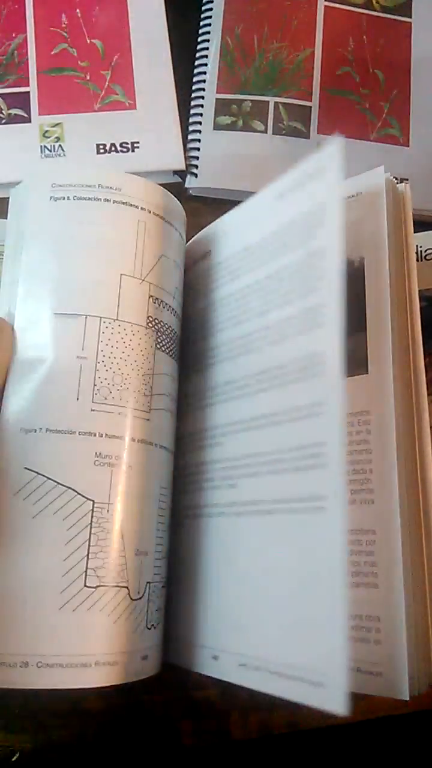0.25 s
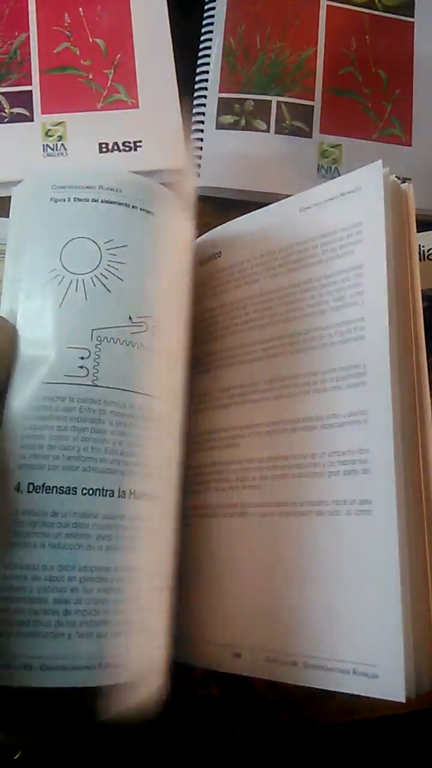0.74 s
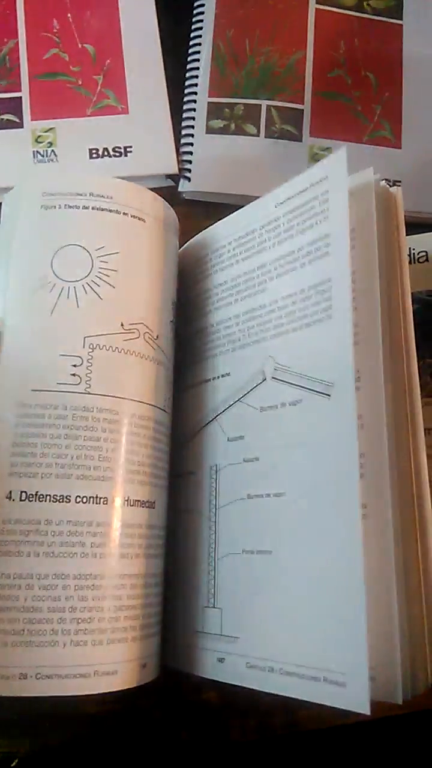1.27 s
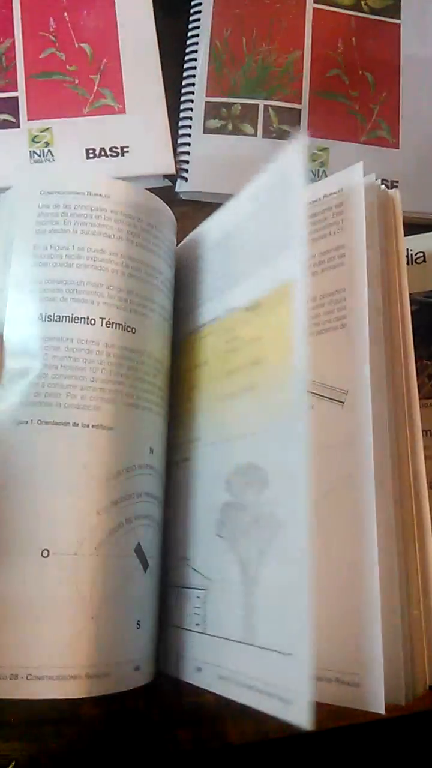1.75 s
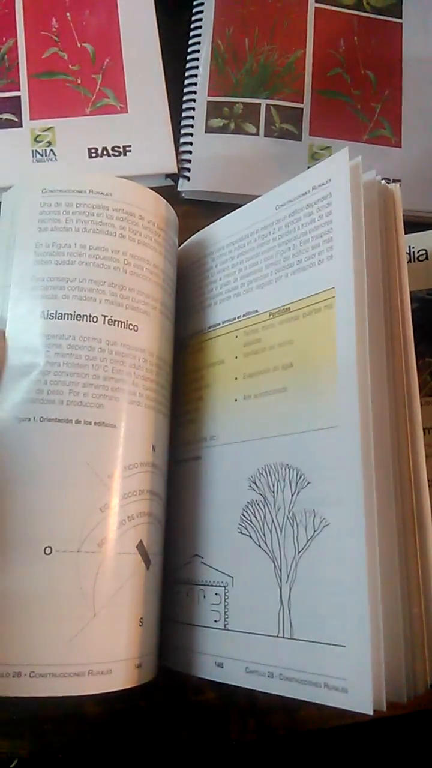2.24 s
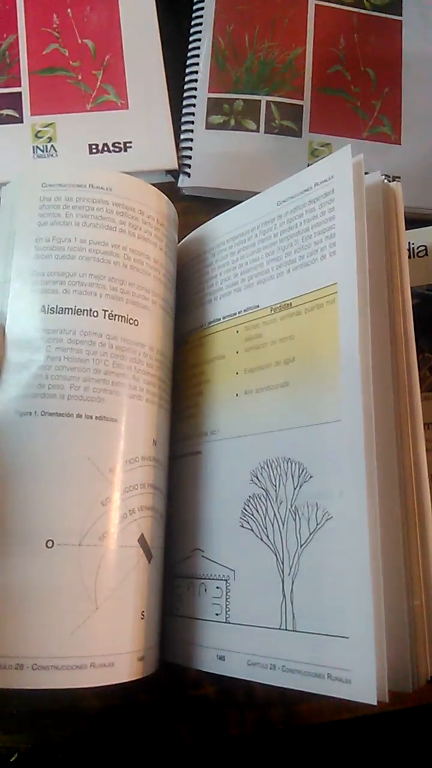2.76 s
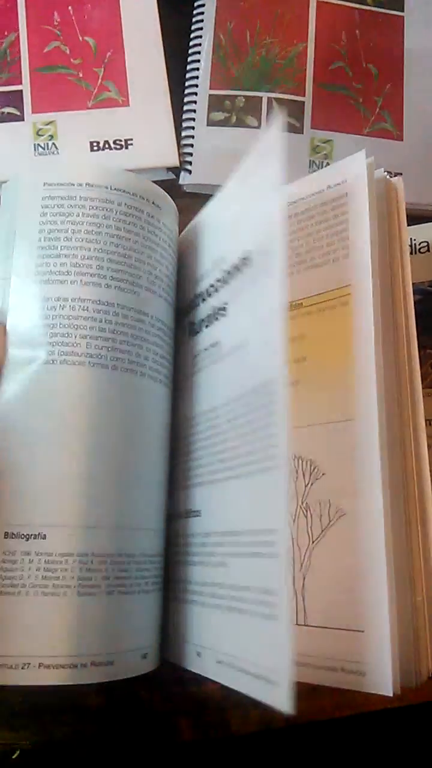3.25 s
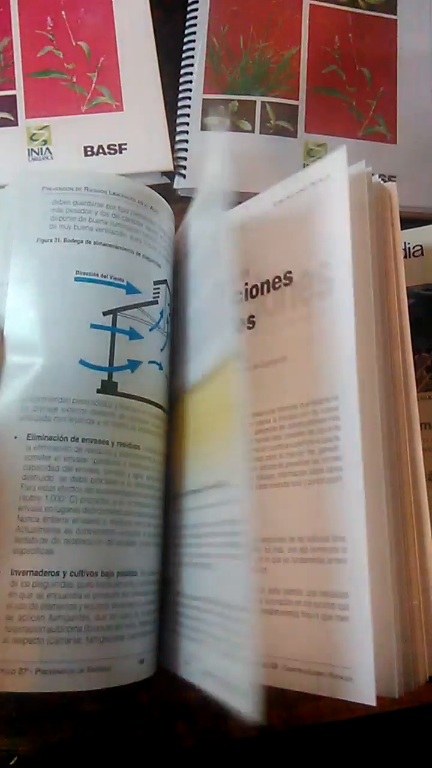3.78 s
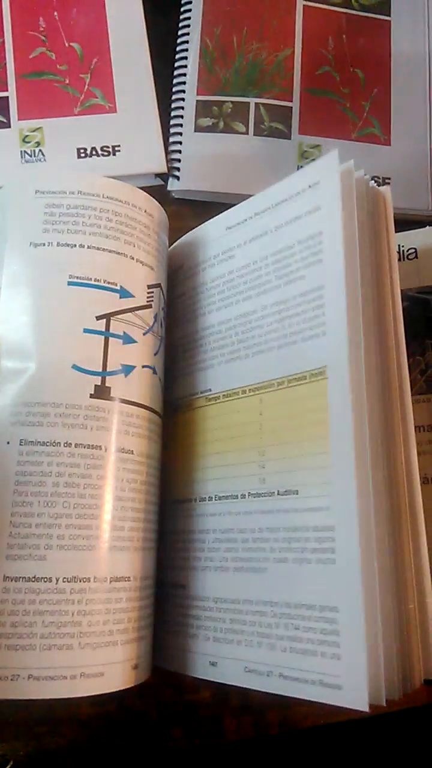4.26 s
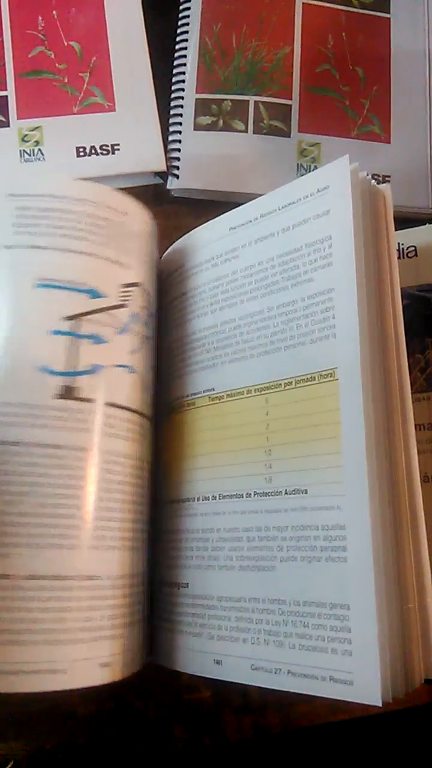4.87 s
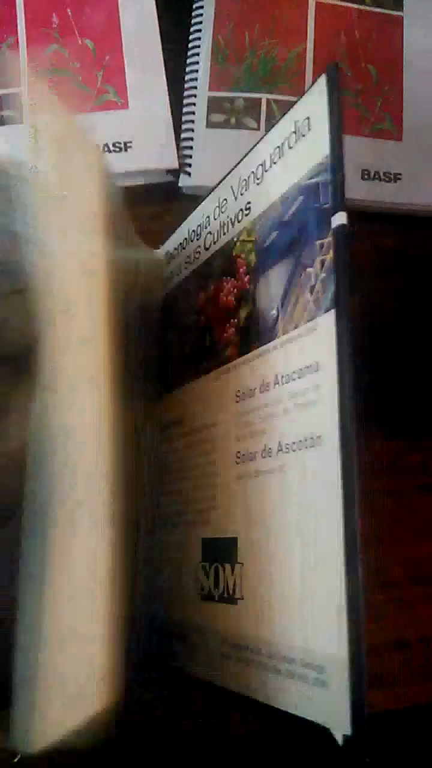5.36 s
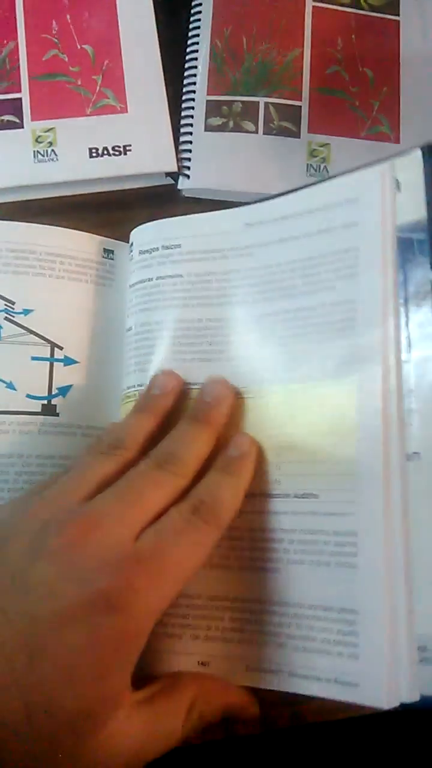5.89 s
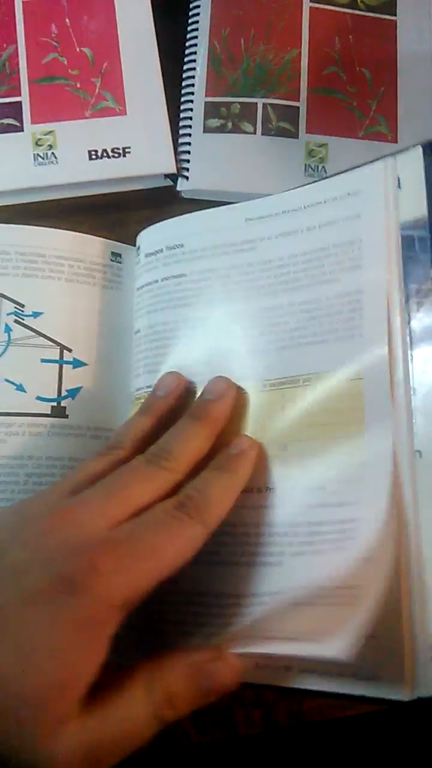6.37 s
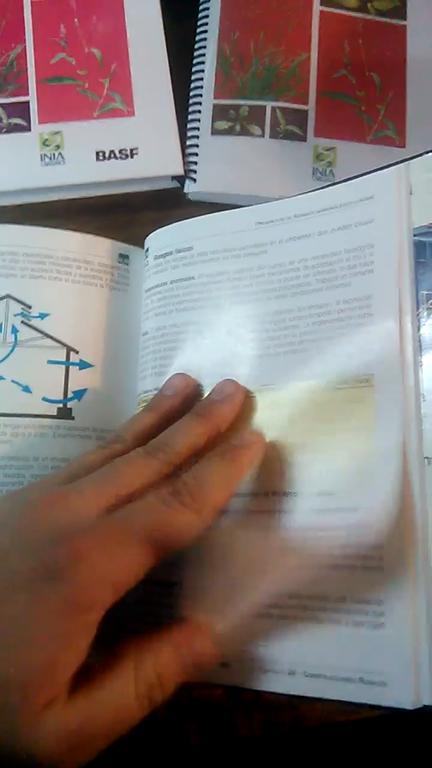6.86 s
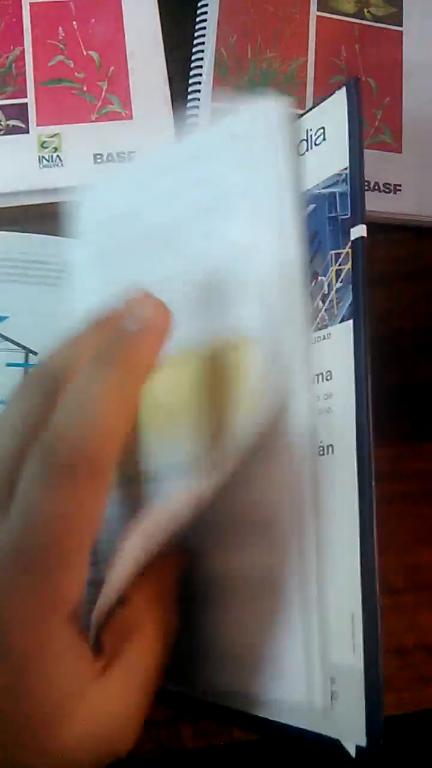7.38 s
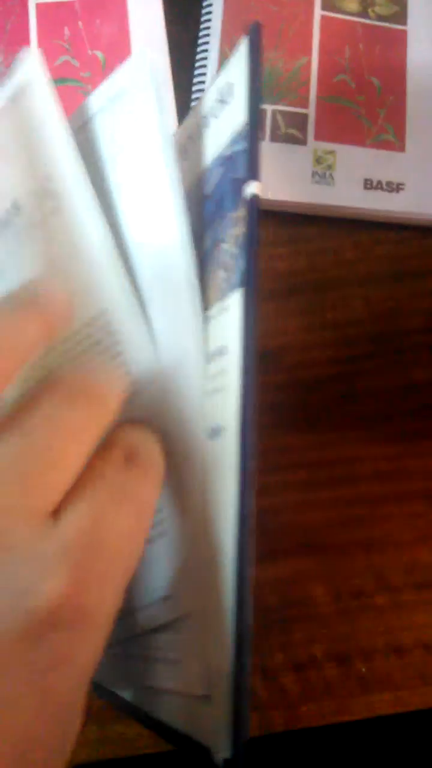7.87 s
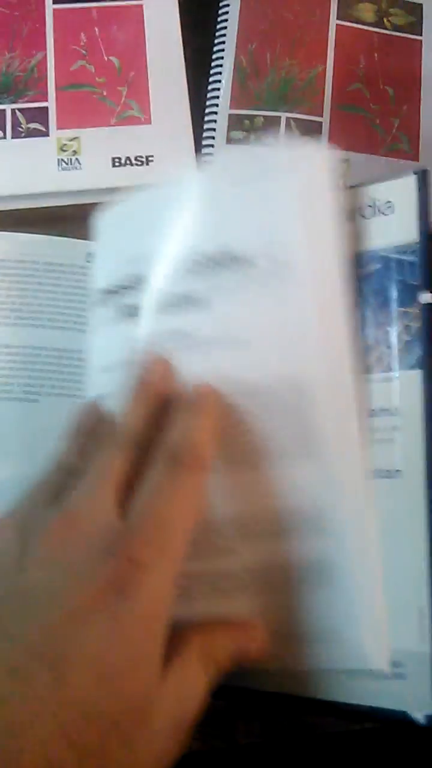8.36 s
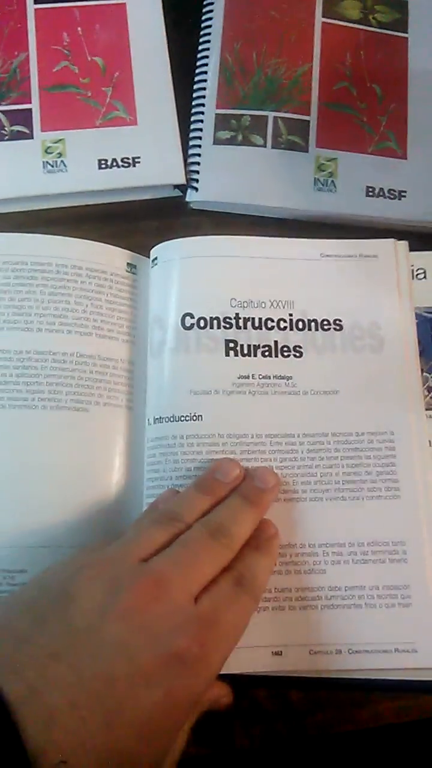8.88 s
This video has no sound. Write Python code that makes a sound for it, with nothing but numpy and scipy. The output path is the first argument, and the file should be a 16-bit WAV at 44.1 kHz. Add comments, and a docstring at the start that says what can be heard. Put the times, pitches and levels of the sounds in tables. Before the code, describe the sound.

Book pages are turned and riffled by hand, crackling and rustling with a soft thud, over a faint low hum.

```python
"""Leafing through a thick book

A hand turns, riffles and drops pages close to a one-microphone phone in a small room.
Edges buckle, crackle and snap; sheets slide and flap; fingers stick and slip on glossy paper;
the block of pages thuds on the table. A low wavering hum fills the room.
The phone dulls the treble and limits the loudest moments."""
import sys
import numpy as np
from scipy import signal
from scipy.fft import rfft, irfft, next_fast_len
from scipy.io import wavfile
from scipy.ndimage import uniform_filter1d, minimum_filter1d, map_coordinates

SR = 44100
rng = np.random.default_rng(int(sys.argv[2]) if len(sys.argv) > 2 else 0)


def digitize_waveform(pressure):
    """Quantize a signal to 16-bit integers and store it at the path in sys.argv[1].

    Rows of a 2-D input are taken as channels; values are limited to [-1, 1].
    """
    field = np.atleast_2d(pressure).T
    bounded = np.clip(field, -1, 1)
    quanta = np.round(bounded * 32767).astype(np.int16)
    wavfile.write(sys.argv[1], SR, quanta)


N = 402633
FLAT = [(20, 0), (20000, 0)]  # White spectrum. Each row: frequency in Hz, level in dB.


def amp(db):
    """Gain of a level in dB."""
    return 10 ** (np.asarray(db) / 20)


def unit(x):
    """x at rms 1."""
    return x / np.sqrt(np.mean(x ** 2) + 1e-20)


def along(points, hz):
    """Interpolate (Hz, value) points on a log axis."""
    knots_hz, values = np.transpose(points)
    return np.interp(np.log(hz + 1), np.log(knots_hz + 1), values)


def band(hz, centre_hz, octaves):
    """Bell of gain, 6 dB down at its edges."""
    return amp(-24 * (np.log2((hz + 1) / centre_hz) / octaves) ** 2)


def resonance(hz, centre_hz, width_hz, db, skirt):
    """Resonant peak; a larger skirt exponent steepens its sides."""
    return amp(db) / (1 + (2 * (hz - centre_hz) / width_hz) ** 2) ** skirt


def filtered(x, response):
    """x through a response given as a function of Hz."""
    size = next_fast_len(N + SR // 2)
    return irfft(rfft(x, size) * response(np.fft.rfftfreq(size, 1 / SR)), size)[..., :N]


def wobble(rate_hz):
    """Smooth random curve, rate_hz knots a second."""
    knots = rng.standard_normal(int(N * rate_hz / SR) + 4)
    return map_coordinates(knots, [np.arange(N) * rate_hz / SR])


def peaks(peak_s, db, rise_db_per_s, fall_db_per_s):
    """Summed gain of peaks that rise and fall linearly in dB."""
    grid = np.arange(0, N + 64, 64)
    since_s = grid[:, None] / SR - peak_s
    gain = amp(db + np.where(since_s < 0, rise_db_per_s, -fall_db_per_s) * since_s).sum(axis=1)
    return np.interp(np.arange(N), grid, gain)


def stroke(length_s, attack_s, release_s):
    """Time axis and envelope: rise, hold until length_s, fall 60 dB per release_s."""
    t = np.arange(round((length_s + 0.2) * SR)) / SR
    return t, np.clip(t / attack_s, 0, 1) * amp(-60 * np.maximum(t - length_s, 0) / release_s)


def shaped(x, envelope):
    """x under an envelope, at rms 1 where it is open."""
    return envelope * x * np.linalg.norm(envelope) / np.linalg.norm(envelope * x)


def span(x, start_s, t):
    """View of x from start_s, as long as t."""
    return x[round(start_s * SR):][:len(t)]


def grainy_noise(spectrum, rate_hz, spread_db, share, clump_db, patchy_db):
    """Uneven impulses (in paper, tiny buckles) plus noise, rms 1; share is their part of the power."""
    chance, size, noise = rng.random(N), rng.exponential(1, N), rng.standard_normal((2, N))
    grains = unit((chance < rate_hz / SR) * amp(spread_db * np.minimum(size, 2.5)) * noise[0])
    mix = amp(clump_db * wobble(45)) * (np.sqrt(share) * grains + np.sqrt(1 - share) * noise[1])
    frames = signal.stft(mix, nperseg=256)[2]
    patches = uniform_filter1d(rng.standard_normal(frames.shape), size=3, axis=0)  # over frequency
    patches = uniform_filter1d(patches, size=12, axis=1)  # over time
    mix = signal.istft(frames * amp(patchy_db * unit(patches)), nperseg=256)[1][:N]
    return unit(filtered(mix, lambda hz: amp(along(spectrum, hz))))


def sheet_reflection(hz, depth_db=3):
    """A near sheet throws sound back after 1-2 ms and ripples its spectrum."""
    return amp(depth_db * np.cos(2 * np.pi * hz * rng.uniform(.001, .002)))


def hum():
    """Low drone, narrow tones and thin hiss, each wavering in level."""
    # Spectra. Each row: frequency in Hz, relative level in dB.
    drone_spectrum = [(15, -59), (25, -19.5), (55, -3.5), (124, -6), (253, -3), (372, -8), (448, -12.5),
                      (531, -9), (601, -16), (818, -11), (1000, -18.5), (1300, -62.5), (2200, -120)]
    hiss_spectrum = [(700, -26), (1100, -0.5), (2000, -3.5), (3200, -7), (3700, -11.5), (4300, -2.5),
                     (6000, -8), (16000, 1)]
    # Two low tones, then the upper ones. Each row: centre in Hz, width in Hz, relative level in dB.
    tone_bands = [(180.5, 8.5, -1.5), (260.2, 10, -2.5), (366, 40, -8), (545.7, 37, -7), (670, 95, -10.5),
                  (805, 24, 0), (857.4, 32, -4)]
    # Drift of drone and low tones. Each row: time in seconds, gain in dB.
    drift = [(0.0, -46.5), (5.74, -50.5), (7.5, -47), (9.13, -51)]
    # Swells of the upper tones. Each row: time in seconds, peak in dB.
    swells = [(.05, -45), (.45, -45), (0.851, -50.5), (1.318, -40.5), (2.2, -44), (2.62, -50), (3.151, -43),
              (3.429, -46.5), (4.06, -46), (4.702, -52), (4.84, -44.5), (5.051, -44.5), (6.142, -43),
              (6.6, -45)]
    drone = grainy_noise(drone_spectrum, rate_hz=50, spread_db=1.5, share=.05, clump_db=.6, patchy_db=2)
    tones = [amp(2.5 * wobble(6))
             * filtered(rng.standard_normal(N), lambda hz: resonance(hz, *row, skirt=1.05))
             for row in tone_bands]
    swell = amp(-60) + peaks(*np.transpose(swells), rise_db_per_s=300, fall_db_per_s=100)
    hiss = grainy_noise(hiss_spectrum, rate_hz=100, spread_db=1.5, share=.03, clump_db=.8, patchy_db=2.2)
    low = amp(2.5 * wobble(3.19)) * drone + amp(-9) * unit(sum(tones[:2]))
    low *= amp(np.interp(np.arange(N) / SR, *np.transpose(drift)))
    return low + swell * unit(sum(tones[2:])) + amp(-52 + 5.9 * wobble(2.88)) * hiss


def room(x):
    """Reverberation: each frequency dies at its own speed."""
    # Room decay. Each row: frequency in Hz, T60 in seconds.
    decay = [(200, 0.99), (2000, 0.42), (7000, 0.5)]
    hz, t, frames = signal.stft(rng.standard_normal(SR // 2), SR, nperseg=256)
    tail = signal.istft(frames * amp(-60 * t / along(decay, hz)[:, None]), SR, nperseg=256)[1]
    return signal.fftconvolve(np.pad(x, (300, 0)), tail / np.linalg.norm(tail))[:N]


def finger_creaks():
    """Skin sticks and slips, ringing the pressed page; its resonances shift from grip to grip."""
    # Each row: start in seconds, length in seconds, level in dB, tilt in dB per octave.
    creaks = [(6.106, 0.04, -35, -3), (6.149, 0.015, -24, -1.5), (6.18, 0.03, -29, -2.5),
              (6.214, 0.0079, -19, -4), (6.388, 0.029, -29.5, -2.5), (6.447, 0.025, -38.5, -11.5),
              (6.519, 0.0092, -38.5, 11), (6.652, 0.008, -24, 0.5), (6.658, 0.051, -29, 5.5),
              (6.852, 0.062, -47, 6)]
    # Resonances of the glossy page. Each row: centre in Hz, width in Hz, relative level in dB.
    modes = [(1384, 184, -2), (2400, 520, -7), (3810, 1060, 8.5), (5640, 990, 1), (6670, 2600, -0.5),
             (9300, 2000, -4)]
    out = np.zeros(N + SR)
    grit = grainy_noise(FLAT, rate_hz=1000, spread_db=2.5, share=.45, clump_db=2, patchy_db=1.5)
    for start_s, length_s, db, tilt_db in creaks:
        t, envelope = stroke(length_s, attack_s=.003 + .15 * length_s, release_s=.03)
        hz = np.fft.rfftfreq(len(t), 1 / SR)
        page = 0
        for centre_hz, width_hz, mode_db in modes:
            centre_hz *= np.exp(rng.normal(0, .025))
            mode_db += rng.normal(0, 1.5) + tilt_db * np.log2(centre_hz / 3000)
            page += resonance(hz, centre_hz, width_hz, mode_db, skirt=1.45)
        creak = irfft(rfft(span(grit, start_s, t)) * page, len(t))
        span(out, start_s, t)[:] += amp(db) * shaped(creak, envelope)
    return out[:N]


def block_thuds():
    """The block of pages lands or shifts and shakes the table: a rough low swing, sinking in pitch."""
    # Each row: start in seconds, length in seconds, level in dB, first and last pitch in Hz.
    thuds = [(1.303, 0.047, -35.5, 107, 83), (5.491, 0.003, -12.5, 350, 304),
             (5.541, 0.088, -19.5, 127, 51.5), (5.575, 0.045, -21.5, 210, 161),
             (7.2, 0.095, -43.5, 61.6, 57.7), (8.919, 0.0056, -31.5, 201, 162)]
    release_cycles = 2.2
    out = np.zeros(N + SR)
    wander = np.pad(1 + .21 * wobble(90), (0, SR))
    for start_s, length_s, db, first_hz, last_hz in thuds:
        t, envelope = stroke(length_s, attack_s=.0021, release_s=release_cycles / last_hz)
        glide_hz = last_hz + (first_hz - last_hz) * np.exp(-4.5 * t / length_s)
        phase = 2 * np.pi * np.cumsum(glide_hz * span(wander, start_s, t)) / SR
        span(out, start_s, t)[:] += amp(db) * envelope * np.sin(phase)
    return out[:N] * amp(2.5 * wobble(100))


def overload_tick(start_s=5.554, centre_hz=12000, octaves=1.7, t60_s=.02):
    """Thin, bright tick of the phone overloading on the loudest thud."""
    t = np.arange(N) / SR - start_s
    burst = (t > 0) * amp(-60 * np.abs(t) / t60_s) * rng.standard_normal(N)
    return filtered(burst, lambda hz: band(hz, centre_hz, octaves))


def paper_scrapes():
    """Grainy friction of finger or page rings the sheet and hisses along the edge."""
    # Each row: start in seconds, length in seconds, sheet centre in Hz, sheet width in octaves,
    # sheet level in dB, edge centre in Hz, edge level in dB.
    strokes = [(0.621, 0.0061, 2400, 0.27, -34, 6600, -37.5), (2.919, 0.0029, 2910, 0.23, -31.5, 5000, -48),
               (3.524, 0.082, 2520, .7, -57.5, 5000, -67), (3.751, 0.052, 1890, 1.1, -50.5, 5530, -51),
               (1.004, 0.098, 2350, 0.43, -71, 5060, -46), (1.236, 0.059, 2460, 9.8, -33, 5140, -42),
               (1.279, 0.028, 1830, 0.43, -34, 5250, -32), (1.319, 0.019, 1930, 0.36, -35, 4900, -33),
               (1.47, 0.04, 2600, 2.4, -33, 4760, -35), (1.512, 0.039, 1800, 1.08, -31, 4400, -29),
               (4.13, 0.022, 2940, .5, -54, 5500, -34), (4.182, 0.076, 2100, 1.15, -34, 4700, -36.5),
               (5.15, 0.064, 2680, 0.38, -29, 6330, -19.5), (5.152, 0.12, 1195, 1.77, -30.5, 4500, -40),
               (5.232, 0.017, 1920, 2.6, -28, 5840, -24), (5.285, 0.017, 1110, 1.25, -24, 5600, -30),
               (5.327, 0.11, 1077, 0.79, -19.5, 4970, -37), (5.333, 0.027, 2400, 1.1, -23, 5460, -24.5),
               (5.402, 0.052, 3280, 1, -25, 4950, -50), (5.497, 0.01, 885, 1.54, -18.5, 5000, -55),
               (5.524, 0.08, 690, 2.53, -20, 5060, -48), (6.977, 0.014, 2530, 0.69, -40.5, 6400, -25.5),
               (7.006, 0.023, 960, 0.5, -43, 5000, -40), (7.09, 0.0071, 2330, 0.38, -44, 5000, -34.5),
               (7.149, 0.029, 1000, 0.22, -40.5, 4930, -34.5), (7.187, 0.027, 2240, 2.4, -24.5, 5230, -34),
               (7.292, 0.057, 923, 0.14, -38.5, 5030, -48.5), (7.519, 0.14, 1760, 1.9, -28.5, 4870, -47),
               (7.525, 0.098, 292, 0.56, -40, 5000, -56), (7.551, 0.038, 1540, 2, -28.5, 5100, -31.5),
               (7.742, 0.033, 1490, 2.9, -22, 5200, -27), (7.771, 0.22, 1980, 0.96, -32.5, 4570, -53.5),
               (8.016, 0.0083, 1590, 0.74, -29.5, 4230, -39), (8.171, 0.15, 1830, 0.56, -38.5, 5100, -51),
               (8.398, 0.12, 3060, 0.23, -39.5, 5640, -32.5), (8.474, 0.1, 1700, 3.6, -23, 5260, -25.5),
               (8.52, 0.061, 560, 2.9, -22.5, 4000, -29), (8.691, 0.031, 1812, 0.45, -35, 5370, -29),
               (8.783, 0.15, 1660, 0.81, -37.5, 4760, -44.5)]
    out = np.zeros(N + SR)
    grit = grainy_noise(FLAT, rate_hz=700, spread_db=2.5, share=.25, clump_db=2, patchy_db=2.2)
    crackle = grainy_noise(FLAT, rate_hz=500, spread_db=2.6, share=.45, clump_db=2, patchy_db=2.2)
    for start_s, length_s, sheet_hz, octaves, sheet_db, edge_hz, edge_db in strokes:
        t, envelope = stroke(length_s, attack_s=.004 + .8 * length_s ** 2, release_s=.05 + length_s / 3)
        grit_bins, crackle_bins = (rfft(np.roll(x, -rng.integers(N))[:len(t)]) for x in (grit, crackle))
        hz = np.fft.rfftfreq(len(t), 1 / SR)
        colour = band(hz, sheet_hz, octaves) + .07 * band(hz, sheet_hz, octaves + 2.5)
        sheet = shaped(irfft(grit_bins * sheet_reflection(hz) * colour, len(t)), envelope)
        edge = shaped(irfft(crackle_bins * band(hz, edge_hz, octaves=.95), len(t)), envelope)
        span(out, start_s, t)[:] += amp(sheet_db) * sheet + amp(edge_db) * edge
    return out[:N]


def edge_snaps():
    """A buckled edge lets go within milliseconds; the sheet shivers on."""
    # Each row: time in seconds, peak in dB, centre in Hz.
    snaps = [(0.626, -35, 2280), (1.0416, -35, 4180), (1.062, -25, 2450), (1.117, -23, 2580),
             (1.208, -19.5, 5110), (1.224, -7, 5600), (1.232, -5, 4370), (1.287, -8, 5400),
             (1.326, -9, 5000), (1.3425, -20, 2000), (1.362, -17, 2600), (1.385, -18, 4630),
             (1.398, -19.5, 4500), (1.4525, -7, 5500), (1.486, -7, 4930), (1.4953, -8, 5140),
             (1.507, -12, 4760), (1.5246, -8.5, 2600), (1.531, -6.5, 4200), (1.571, -18, 2200),
             (1.5453, -6.5, 5840), (1.6182, -2.5, 3020), (1.8905, -30, 4350), (2.1897, -26.5, 4160),
             (2.907, -21, 5500), (2.9214, -20.5, 2650), (3.985, -16.5, 5740), (4.044, -17, 4600),
             (4.11, -16, 4600), (4.147, -20, 5900), (4.1833, -12, 4400), (4.2404, -3.5, 1940),
             (4.25, -4, 3530), (4.262, -14, 5030), (4.386, -16.5, 4470), (4.3031, -6.5, 4600),
             (4.312, -15, 5160), (4.342, -19.5, 5900), (4.4143, -2, 4130), (4.8453, -26.5, 4440),
             (5.0628, -25.5, 2600), (5.1558, -15, 6270), (5.554, -13, 2320), (6.0034, -8, 6260),
             (6.7383, -13.5, 4240), (7.016, -8, 5530), (7.144, -16.5, 4270), (7.202, -11.5, 2340),
             (7.399, -19, 2040), (7.423, -5, 3020), (7.564, -14, 2420), (7.574, -12, 5300),
             (7.613, -13, 2600), (7.7533, -13, 1910), (7.7654, -17, 2700), (8.478, -4.5, 2400),
             (8.9186, -13.5, 3020), (9.0831, -16, 4820)]
    rise_s, burst_t60_s, shiver_t60_s = .002, .010, .05
    out, t = np.zeros(N + SR), np.arange(1024) / SR
    hz = np.fft.rfftfreq(len(t), 1 / SR)
    envelope = amp(-60 * np.abs(t - rise_s) / np.where(t < rise_s, rise_s, burst_t60_s))
    for time_s, db, centre_hz in snaps:
        burst = envelope * rng.standard_normal(len(t))
        burst[round(rise_s * SR)] += 6  # impulse at the crest
        shiver = (t > rise_s) * amp(-27 - 60 * t / shiver_t60_s) * rng.standard_normal(len(t))
        octaves = max(.5, 1.74 + .021 * db - .59 * np.log2(centre_hz / 4000))  # wider if loud or low
        colour = band(hz, centre_hz, octaves) + .09 * band(hz, 14000, octaves=1)
        click = irfft(rfft(burst) * sheet_reflection(hz) * colour)
        click += irfft(rfft(shiver) * band(hz, centre_hz, octaves=3.8))
        span(out, time_s - .0015, t)[:] += amp(db) * click / np.abs(click).max()
    return out[:N]


def page_rustle():
    """Each movement builds, then settles: edges crackle brightly, sheets slide in the midrange."""
    # Each row: peak time in seconds, build-up in dB per second, edge level in dB, sheet level in dB.
    moves = [(1.06, 119, -83, -48.5), (1.45, 51, -41.5, -49), (1.9, 20, -64.5, -62), (2.2, 70, -60, -65),
             (3.0, 56, -58, -59.5), (4.272, 41, -36.5, -41), (5.05, 60, -57, -57),
             (5.353, 133.5, -27, -25.5), (6.353, 41, -44, -52.5), (7.1, 88, -39, -51.5),
             (7.739, 31, -30.5, -29), (8.332, 81, -78, -36.5), (8.64, 59.5, -32, -31)]
    # Spectra. Each row: frequency in Hz, relative level in dB.
    edge_spectrum = [(1500, -61), (3000, -7.5), (4200, 12), (5000, 5), (6000, 7), (16000, -10.5)]
    sheet_spectrum = [(250, -17), (600, -8.5), (1200, -9), (1800, -2), (2200, -8), (2700, -5.5),
                      (4000, -24)]
    peak_s, rise_db_per_s, edge_db, sheet_db = np.transpose(moves)
    edge_gain, sheet_gain = (peaks(peak_s, db, rise_db_per_s, fall_db_per_s=67.5)
                             for db in (edge_db, sheet_db))
    edge = grainy_noise(edge_spectrum, rate_hz=350, spread_db=3.7, share=.55, clump_db=2, patchy_db=1.3)
    sheet = grainy_noise(sheet_spectrum, rate_hz=400, spread_db=3, share=.25, clump_db=1.4, patchy_db=2.2)
    return edge_gain * edge + sheet_gain * sheet


def scene():
    """Book, room and hum, alike in both channels."""
    paper = page_rustle() + paper_scrapes() + edge_snaps()
    fingers = finger_creaks()
    reverb = amp(-10.5) * room(paper + .5 * fingers)
    return np.tile(paper + fingers + reverb + block_thuds() + overload_tick() + hum(), (2, 1))


def record(dry):
    """The phone dulls the treble, rides its gain, limits loud passages and peaks, adds faint noise."""
    # Phone response and noise floor. Each row: frequency in Hz, gain in dB.
    response = [(20, -26.5), (45, 1.5), (5900, 0), (6600, -7.5), (7200, -18.5), (8000, -36.5),
                (9200, -24.5), (9900, -29), (10600, -41), (14000, -39)]
    noise_spectrum = [(3000, -110), (7000, -69), (10000, -85), (14000, -86.5)]
    port_hz, port_width_hz, top_hz = 4000, 330, 14300
    ride_db, ride_s, ride_share = -33, .6, .25  # threshold, time constant, part of the excess removed
    rms_limit_db, peak_limit = -20, .45

    def port(hz):
        """All-pass: the microphone port delays one band a little."""
        pole = port_hz ** 2 - hz * hz + 1j * hz * port_width_hz
        return np.conj(pole) / pole

    x = filtered(dry, lambda hz: amp(along(response, hz)) * port(hz))
    memory = np.exp(-1 / (ride_s * SR))
    slow_power = signal.lfilter([1 - memory], [1, -memory], x ** 2)
    x *= (1 + slow_power / amp(ride_db) ** 2) ** (-ride_share / 2)
    rms = np.sqrt(np.abs(uniform_filter1d(x ** 2, size=700)))
    x *= uniform_filter1d(np.minimum(1, amp(rms_limit_db) / (rms + 1e-9)), size=400)
    peak_gain = minimum_filter1d(np.minimum(1, peak_limit / (np.abs(x) + 1e-9)), size=121)
    x *= uniform_filter1d(uniform_filter1d(peak_gain, size=61), size=61)
    noise = filtered(rng.standard_normal(x.shape), lambda hz: amp(along(noise_spectrum, hz)))
    return filtered(x + noise, lambda hz: hz < top_hz)


dry = scene()
out = record(dry)
digitize_waveform(out)
```